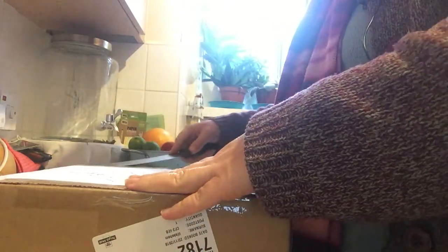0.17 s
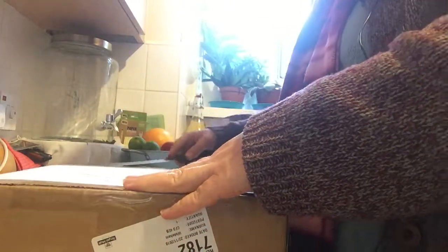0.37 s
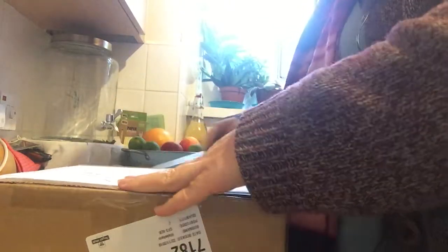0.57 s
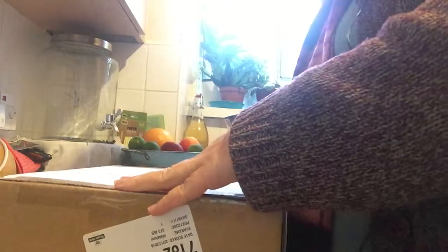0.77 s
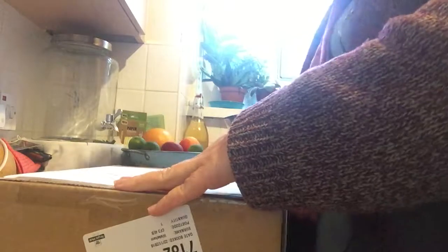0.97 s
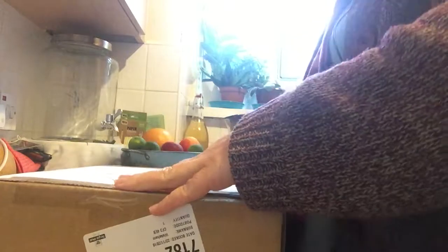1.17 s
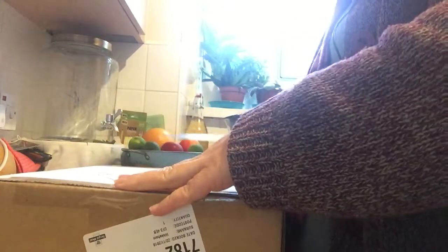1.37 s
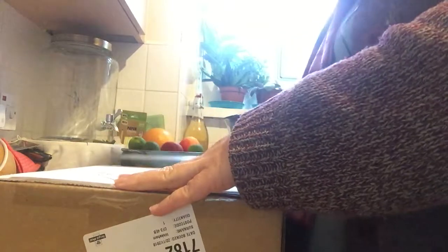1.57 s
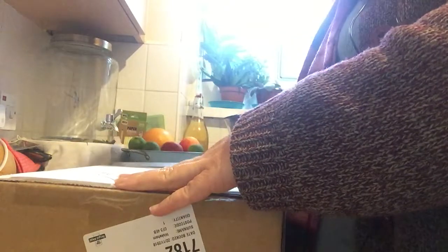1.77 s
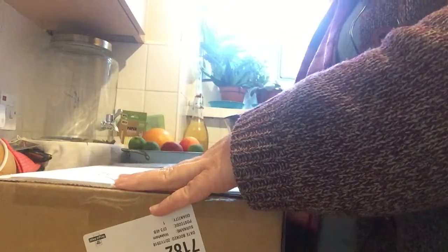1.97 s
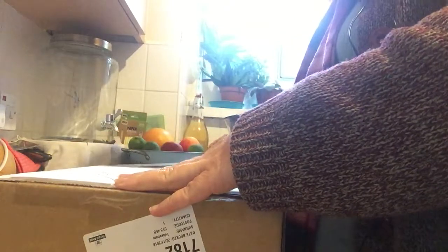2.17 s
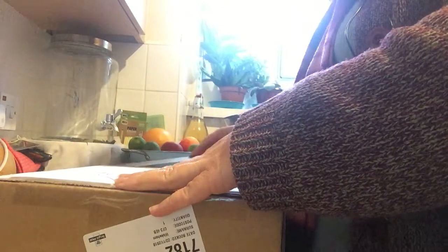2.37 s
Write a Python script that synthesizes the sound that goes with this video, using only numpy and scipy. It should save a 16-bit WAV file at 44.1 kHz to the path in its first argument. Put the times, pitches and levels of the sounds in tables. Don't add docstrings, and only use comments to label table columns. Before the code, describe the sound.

Knife cutting a parcel open: quick rip, longer gritty scrape, another scrape with a hard hollow thump, then soft dragging, faint ticks and taps over a low fridge hum, recorded very close in a tiled kitchen.

```python
import sys
import numpy as np
from scipy import signal
from scipy.fft import rfft, irfft
from scipy.io import wavfile
from scipy.ndimage import uniform_filter1d

SR = 44100
rng = np.random.default_rng(int(sys.argv[2]) if len(sys.argv) > 2 else 0)


def log_audio(samples):
    frames = np.atleast_2d(samples).T
    limited = np.clip(frames, -1, 1)
    pcm = np.round(limited * 32767).astype(np.int16)
    wavfile.write(sys.argv[1], SR, pcm)


def volts(x):
    e = np.asarray(x, float) / 20
    return 10 ** e


N = 106236
T = np.arange(N) / SR


def unit(x):
    return x / np.sqrt(np.mean(x ** 2))


def noise():
    return rng.standard_normal(N)


def colour(x, table):
    f, p = np.fft.rfftfreq(N, 1 / SR) + 1, np.array(table)
    db = np.interp(np.log(f), np.log(p[:, 0]), p[:, 1])
    db = db - 12 * np.clip(np.log2(p[0, 0] / f), 0, 9)
    return unit(irfft(rfft(x) * volts(db), N))


def ring(x, hz, t60):
    pole = np.exp((2j * np.pi * hz - np.log(1000) / t60) / SR)
    return signal.lfilter([1], [1, -pole], x).imag


def glide(x, hz, width):
    turn, pole = np.exp(2j * np.pi * np.cumsum(hz) / SR), np.exp(-np.pi * width / SR)
    return unit((signal.lfilter([1], np.poly([pole, pole]), x / turn) * turn).real)


def walk(rate):
    k = int(SR / rate)
    return unit(uniform_filter1d(uniform_filter1d(noise(), k), k))


def grains(rate, spread_db):
    draw, size, sign = rng.random(N), rng.exponential(1, N), noise()
    return unit((draw < rate / SR) * sign * volts(spread_db * np.minimum(size, 4)))


def effort(column):
    # peak in seconds, rise and fall in seconds per 20 dB, box level in dB, tearing level in dB
    pulls = [(.002, .01, .018, -42, -57), (.088, .008, .05, -36, -56), (.1, .02, .03, -35, -56),
             (.1142, .0012, .01, -30, -31), (.121, .003, .012, -29, -28), (.127, .006, .009, -26, -28),
             (.133, .006, .008, -29, -44), (.1445, .004, .03, -33, -32), (.16, .02, .04, -31, -41),
             (.234, .015, .012, -40, -60), (.275, .04, .06, -44, -53), (.408, .008, .08, -30, -43),
             (.435, .03, .08, -30, -43), (.45, .02, .04, -30, -42), (.471, .008, .07, -30, -39),
             (.495, .03, .07, -29, -39), (.525, .04, .06, -31, -40), (.553, .02, .03, -33, -43),
             (.575, .006, .024, -26, -31), (.778, .012, .05, -34, -60), (.789, .002, .035, -29, -37),
             (.801, .012, .012, -32, -36), (.826, .003, .04, -40, -48), (.846, .02, .03, -35, -45),
             (.868, .03, .018, -32, -52), (.903, .012, .06, -33, -39), (.92, .02, .06, -30, -35),
             (.937, .02, .06, -29, -32), (.958, .03, .055, -29, -34), (.985, .03, .035, -34, -40),
             (1.008, .03, .014, -37, -48), (1.1, .15, .1, -42, -58), (1.38, .006, .02, -62, -68),
             (2.25, .006, .03, -52, -52), (1.89, .014, .012, -58, -51), (1.903, .006, .02, -60, -54),
             (1.975, .006, .018, -54, -50), (2.322, .018, .016, -47, -43)]
    rounding = .25
    power, t = 0, T[::16]
    for row in pulls:
        u = np.where(t < row[0], (row[0] - t) / row[1], (t - row[0]) / row[2])
        power = power + volts(row[column] - 20 * (np.hypot(u, rounding) - rounding)) ** 2
    return np.interp(T, t, np.sqrt(power))


def drag(column):
    # time in seconds, hiss level in dB, box level in dB
    p = np.array([(0, -74, -75), (.05, -62.5, -50), (.08, -54.5, -46), (0.201, -62, -92),
                  (0.302, -53, -46.5), (0.351, -56, -56), (0.387, -64.5, -50), (.62, -54, -55),
                  (.74, -51, -46.5), (.88, -53, -39.5), (1.04, -54.5, -47), (1.17, -49, -44.5),
                  (1.26, -62.5, -54.5), (1.36, -84, -59), (1.6, -86, -71.5), (1.85, -95, -79),
                  (2.05, -74.5, -65), (2.209, -56, -46.5), (2.3, -58.5, -53), (2.41, -59, -53)])
    return volts(np.interp(T, p[:, 0], p[:, column]))


def taut(column):
    # time in seconds, ringing in dB against the plain tearing, pitch factor
    p = np.array([(0, -10, 1), (.3, -8, 1), (.4, -16, 1.15), (.56, -15, 1.05), (.62, -7, 1), (.89, -7, .9),
                  (.912, -3, .66), (.935, 1, .95), (.955, -2, 1.03), (.97, -9, 1), (1.1, -9, 1),
                  (2.41, -3, 1)])
    return np.interp(T, p[:, 0], p[:, column])


def box():
    # time in seconds, level in dB, contact in seconds (negative for a pull)
    taps = [(.114, -23, .0008), (0.1211, -22.5, -.001), (0.1244, -23, -.0006), (0.134, -22, -.0012),
            (0.498, -43, .0005), (.578, -37, .0008), (0.778, -24.5, -.002), (0.908, -13, 0.0051),
            (0.915, -24, .003), (0.923, -24, .003), (1.009, -27, -.002), (1.292, -50, -.0015),
            (1.67, -59.5, .0008), (1.897, -36, 0.0004), (1.903, -58, -.0005), (1.987, -43.5, 0.0015),
            (2.251, -40, .002), (2.324, -36, 0.00046), (2.331, -43, -.0008), (2.405, -55, .001)]
    # pitch in Hz, level when scraped in dB, level when tapped in dB, 60 dB fade in seconds
    modes = [(132.5, 3, 1, 0.077), (221, -2.5, -5.5, 0.058), (294, -2, -0.5, 0.043),
             (354.7, -2, -8.5, 0.061), (419, -3, -24, 0.038), (492.3, -3, 5.5, 0.058),
             (593, -3.5, -0.5, 0.062), (667.7, -4, -9, 0.067), (753.5, -4, -3, 0.058), (896, -5, -3, 0.027),
             (1099, -13, -16, 0.018), (1208, -12, 5.5, 0.04), (2380, -12.5, -24, 0.0046),
             (1908, -13.5, -32, 0.042)]
    slips_per_s, slip_spread_db, clump_db = 1800, 2.2, 1.6
    box_db, shift_db = -1, 1.3
    board_tilt, board_hz = 0.55, 760
    low_cut_hz = 140.7

    slips = unit(grains(slips_per_s, slip_spread_db) * volts(clump_db * walk(120)))
    force = slips * effort(column=3) * volts(box_db)
    force = force + noise() * volts(2.0 * walk(25)) * drag(column=2)
    push = np.zeros(N)
    for s, db, contact in taps:
        push += volts(db) * np.exp(-((T - s) / contact * 2) ** 2) / (contact * SR)

    scale = np.sqrt(sum(volts(row[1]) ** 2 for row in modes) * SR / np.log(1000) / 4)
    out, taut_db = 0, taut(column=1)
    for k, (hz, scraped_db, tapped_db, t60) in enumerate(modes):
        favour_db = -board_tilt * (taut_db + 8.0) * min(hz / board_hz, 1) ** 2
        scraped = force * volts(scraped_db + favour_db + shift_db * walk(8.4)) / scale / np.sqrt(t60)
        out = out + ring((-1) ** k * scraped + push * volts(tapped_db), hz, t60)
    return signal.sosfilt(signal.butter(3, low_cut_hz, "high", fs=SR, output="sos"), out)


def tearing():
    # pitch in Hz, level in dB per Hz
    tear_colour = [(590, -37), (1000, -1), (1550, -7), (1930, -9.5), (2930, -10), (5680, -11.5),
                   (7850, -10), (11200, -15.5), (15900, -13)]
    # pitch in Hz, level in dB per Hz
    rub_colour = [(530, -33), (900, -6), (1530, -3.5), (1750, -1.5), (1950, -4.5), (3070, -9.5), (5820, -7),
                  (11400, -11), (16000, -21.5)]
    # pitch in Hz, width in Hz, level in dB,
    # share of the pitch change from 0 to 1
    resonances = [(2800, 300, -12, .5), (3900, 600, -7, .5), (5600, 1200, 0, 1), (7200, 900, -6, .3),
                  (10800, 1800, -3, 0)]
    # time in seconds, level in dB
    squeak = [(0, -93), (.3, -68), (1.0, -79), (1.2, -67), (1.33, -70), (1.43, -81), (1.57, -82),
              (1.62, -100), (2.05, -100), (2.15, -70), (2.25, -65), (2.3, -56), (2.35, -64), (2.41, -62)]
    # pitch in Hz, width in Hz, level in dB
    flap_bands = [(757, 110, -56), (2810, 240, -66.5), (5900, 440, -63)]
    fibres_per_s, fibre_spread_db, fibre_clump_db = 20000, 1.5, .9
    tear_db, patch_db = -1.5, 2.5
    squeak_hz, squeak_width_hz = 1935, 45
    flap_s, flap_span_s = 2.21, 0.086

    snaps = grains(fibres_per_s, fibre_spread_db) * volts(fibre_clump_db * walk(150))
    pitch = taut(column=2)
    tape = 0
    for hz, width, db, share in resonances:
        tape = tape + volts(db + patch_db * walk(60)) * glide(snaps, hz * pitch ** share, 1.5 * width)
    tape = unit(tape) * volts(taut(column=1))
    torn = (colour(snaps, tear_colour) + tape) * effort(column=4) * volts(tear_db)

    rub = colour(noise(), rub_colour) * volts(0.7 * walk(30))
    rub = (rub + volts(-37.5) * tape) * drag(column=1) * volts(1.3)

    rough = unit(ring(noise(), squeak_hz, 2.2 / squeak_width_hz))
    pure = np.sin(2 * np.pi * np.cumsum(squeak_hz * (1 + .004 * walk(12))) / SR)
    sing_db = np.interp(T, *np.array(squeak).T) + 1.5 * walk(17)
    sing = (.8 * rough + .8 * pure) * volts(sing_db)

    flap = sum(volts(db) * glide(noise(), hz + 0 * T, width) for hz, width, db in flap_bands)
    flap = flap * np.exp(-((T - flap_s) / flap_span_s) ** 2)
    return torn + rub + sing + flap


def ticks():
    # time in seconds, peak in dB, pitch in Hz, wide snap in dB
    tape_ticks = [(0.223, -40, 4600, -6), (0.2832, -36.5, 7300, -6), (0.47, -31, 4900, -10),
                  (0.4893, -28, 5060, -14), (0.5744, -24, 9900, 1), (.8255, -35, 9000, 14),
                  (1.2775, -33, 5670, -12), (1.478, -36.5, 5300, -18), (1.824, -54, 5450, -11),
                  (2.088, -36.5, 11600, -2), (2.1263, -35, 10600, 0), (2.1427, -47, 11500, -6),
                  (2.1563, -31.5, 5700, 4), (2.1898, -48, 6200, -6), (2.246, -34, 6130, 8),
                  (2.2805, -49, 4660, 3), (2.3219, -22.5, 4600, -8)]
    width, snap_s, fizz_db, fizz_s = 0.22, 0.00024, -17.5, 0.015
    bright = signal.butter(3, 4200, "high", fs=SR, output="sos")
    out, age = np.zeros(N), T[:SR // 8]
    for s, db, hz, wide_db in tape_ticks:
        fade = np.exp(-age / snap_s) + volts(fizz_db) * np.exp(-age / fizz_s)
        burst = rng.standard_normal(len(age)) * fade
        burst[0] = 4
        edges = [hz / (1 + width), min(hz * (1 + width), 16000)]
        pitched = signal.sosfilt(signal.butter(1, edges, "band", fs=SR, output="sos"), burst)
        burst = pitched + volts(wide_db - 4) * signal.sosfilt(bright, burst)
        k = int(s * SR)
        out[k:k + len(age)] += (volts(db + 4.0) * burst / np.abs(burst).max())[:N - k]
    return out


def worktop():
    # time in seconds, pressure
    p = np.array([(0, -0.023), (0.084, 0.043), (0.213, -0.045), (0.369, 0.042), (.53, -0.05),
                  (0.702, 0.043), (.8, -0.03), (.9, 0.029), (1.05, 0.037), (1.21, -0.023), (1.311, 0.0088),
                  (1.37, -0.024), (1.466, 0.019), (1.588, -0.021), (1.749, 0.0036), (1.98, 0.0071),
                  (2.12, -0.0034), (2.41, .001)])
    # time in seconds, level in dB, pitch in Hz, 60 dB fade in seconds
    knocks = [
        (.59, -46, 70, .1),
        (.81, -46, 70, .1),
        (1.296, -45, 70, .1),
        (1.2905, -35, 330, .022),
        (1.671, -47, 500, .008),
        (1.38, -56, 1400, .004),
        (1.897, -42, 2000, .004),
    ]
    jolt_s, jolt_size, jolt_back_s, jolt_edge_s = .955, -0.14, 0.02, 0.00031
    shiver_db, shiver_hz, shiver_from_s = -54, 17, 1.97

    place = np.interp(T, p[:, 0], np.arange(len(p)))
    k = np.minimum(place.astype(int), len(p) - 2)
    sway = p[k, 1] + (p[k + 1, 1] - p[k, 1]) * (1 - np.cos(np.pi * (place - k))) / 2

    age = np.maximum(T - jolt_s, 0)
    jolt = jolt_size * (1 - np.exp(-age / jolt_edge_s)) * np.exp(-age / jolt_back_s)

    bumps = 0
    for s, db, hz, t60 in knocks:
        fade = volts(-60 * np.maximum(T - s, 0) / t60) * (T > s)
        bumps = bumps + volts(db) * np.sin(2 * np.pi * hz * (T - s)) * fade

    shiver = volts(shiver_db) * unit(ring(noise(), shiver_hz, 0.27))
    shiver = shiver * (1.2 + np.clip((T - shiver_from_s) * 10, 0, 1))
    return sway + jolt + bumps + shiver


def kitchen():
    # pitch in Hz, level in dB per Hz
    air_colour = [(25, 5), (60, 2), (120, -7), (300, -13.5), (700, -21.5), (1500, -33.5), (5000, -38),
                  (16000, -41)]
    # pitch in Hz, level in dB
    hum_tones = [(323.0, -67.5)]
    air_db = -58.5
    hum = 0
    for hz, db in hum_tones:
        tone = np.sin(2 * np.pi * hz * T + 0.4 * walk(6))
        hum = hum + volts(db + 2 + 0.4 * walk(3.9)) * tone
    return volts(air_db + 2.6 * walk(8.3)) * colour(noise(), air_colour) + hum


def room(near):
    t60, level_db, top_hz = 0.27, -18, 5170
    t = T[:SR // 2]
    tail = rng.standard_normal(len(t)) * volts(-60 * t / t60) * (t > .003)
    tail = signal.lfilter(*signal.butter(1, top_hz, fs=SR), tail)
    return volts(level_db) * signal.fftconvolve(near, tail / np.sqrt(np.sum(tail ** 2)))[:N]


def scene():
    near = box() + tearing() + ticks()
    return (near + room(near) + worktop() + kitchen())[None]


def roll_off(x):
    return signal.sosfilt(signal.butter(12, 16510, fs=SR, output="sos"), x)


def record(dry):
    mix = signal.sosfilt(signal.ellip(8, .2, 30, 15700, fs=SR, output="sos"), dry)
    return roll_off(mix)


dry = scene()
out = record(dry)
log_audio(out)
```